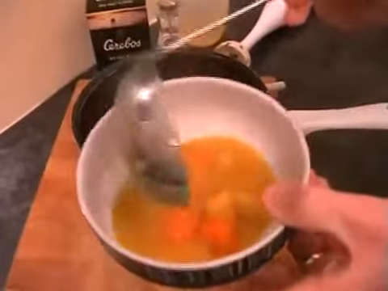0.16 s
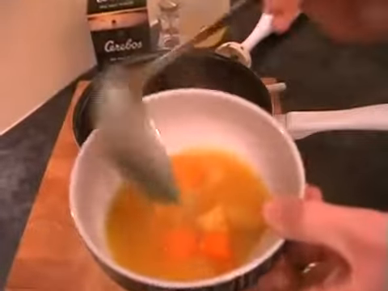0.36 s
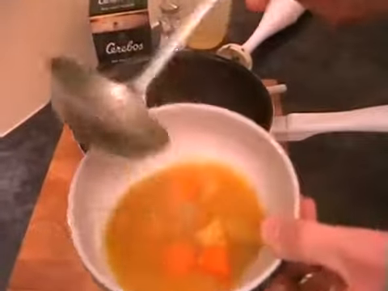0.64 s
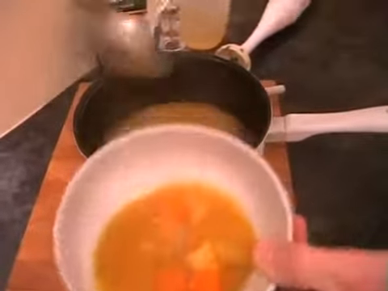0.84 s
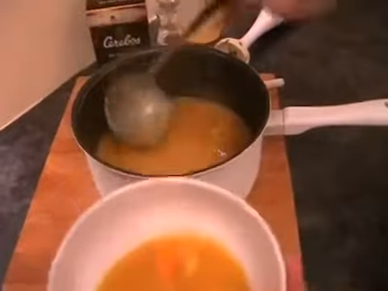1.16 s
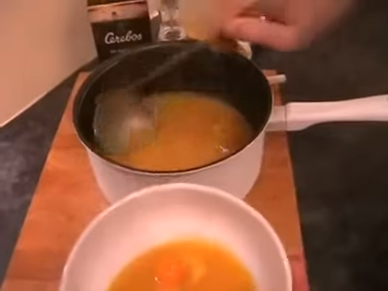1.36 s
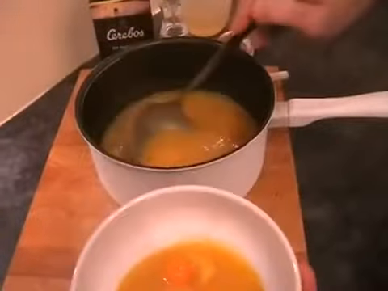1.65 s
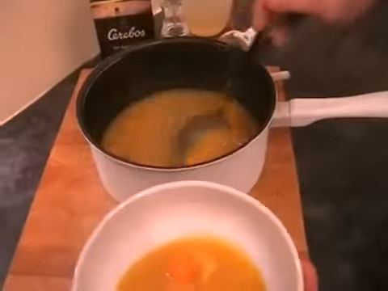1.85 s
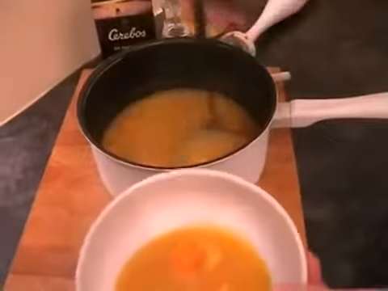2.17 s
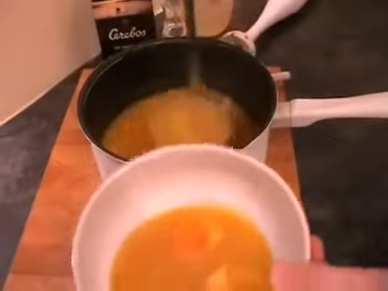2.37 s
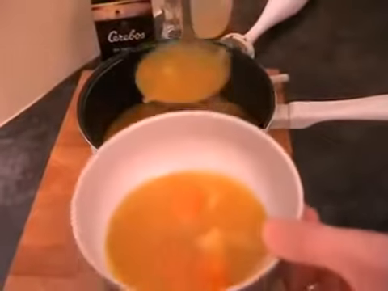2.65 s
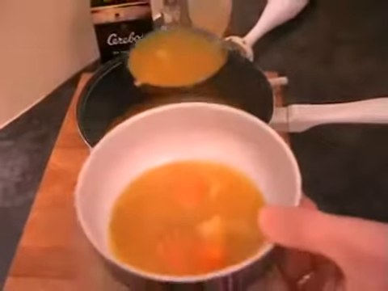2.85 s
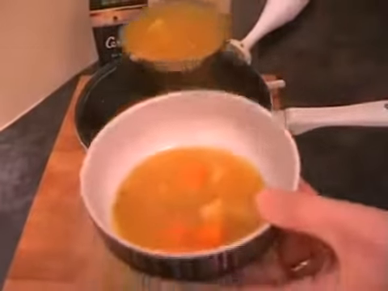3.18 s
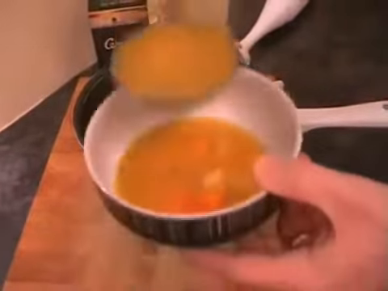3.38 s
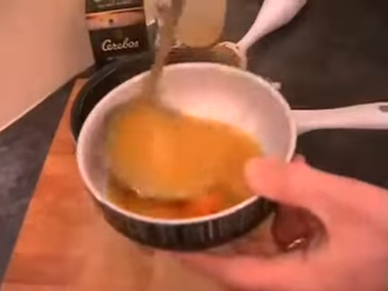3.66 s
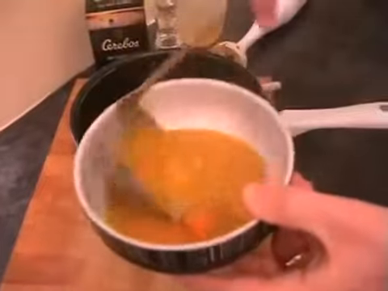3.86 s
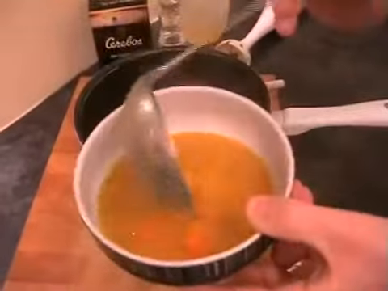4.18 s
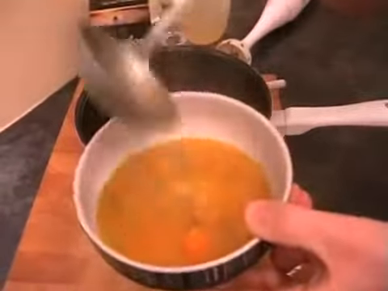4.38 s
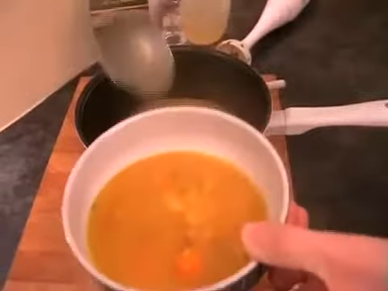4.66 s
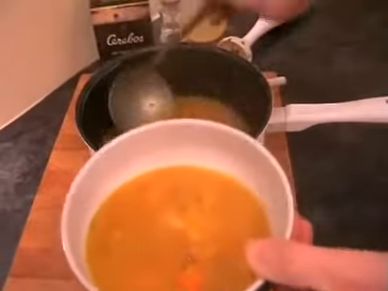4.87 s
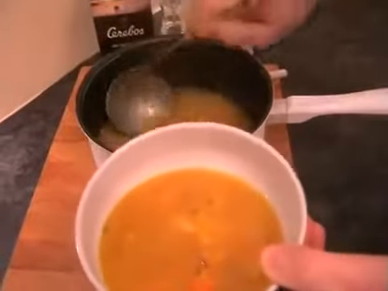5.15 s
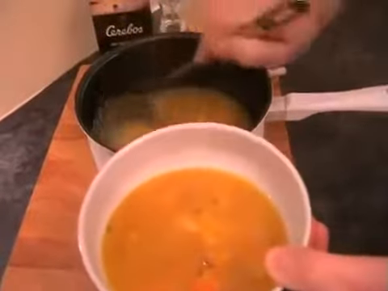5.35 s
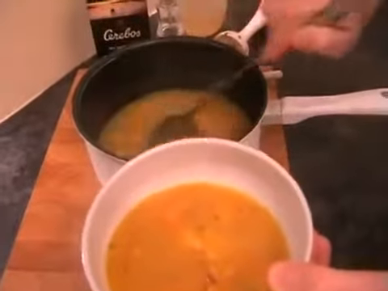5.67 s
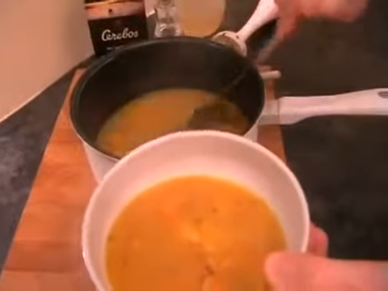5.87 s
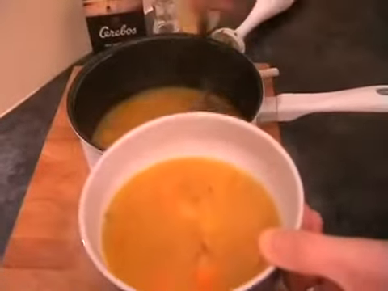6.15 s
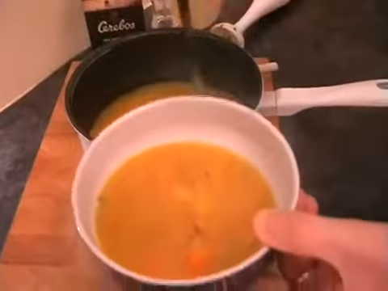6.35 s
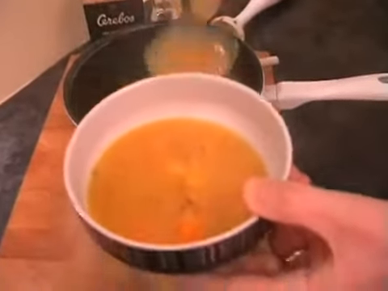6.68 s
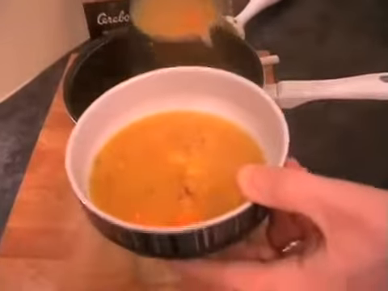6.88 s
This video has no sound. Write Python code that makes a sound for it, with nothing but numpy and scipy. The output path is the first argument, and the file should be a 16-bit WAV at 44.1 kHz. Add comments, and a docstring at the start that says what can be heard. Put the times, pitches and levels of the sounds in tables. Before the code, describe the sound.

A steel ladle knocks against a saucepan with a brief metallic ring, then scrapes and bumps around inside it. Small wet ticks and splats follow as thick soup drips into a bowl. The ladle knocks the pan again and scrapes for longer, with a heavier clunk partway through and a dull knock at the end. Everything sounds close, in a kitchen with a short echo, a faint electrical hum and a soft rumble.

```python
"""Ladling thick soup

A steel ladle serves soup into a bowl from a pan on a wooden board on a kitchen worktop.
Drops tick and splat. The ladle knocks and scrapes the pan: ladle, pan, board and worktop ring
in their own modes. Knocks and drops echo briefly over mains hum and a soft rumble."""
import sys
import numpy as np
from scipy import signal
from scipy.fft import rfft, irfft
from scipy.io import wavfile
from scipy.ndimage import uniform_filter1d

SR = 44100
rng = np.random.default_rng(int(sys.argv[2]) if len(sys.argv) > 2 else 0)


def bounce(signal):
    """Save signal as a 16-bit WAV file at the path given by the first command-line argument."""
    frames = np.transpose(np.atleast_2d(signal))
    limited = np.clip(frames, -1, 1)
    pcm = np.round(limited * 32767).astype(np.int16)
    wavfile.write(sys.argv[1], SR, pcm)


N = 309582

# room noise spectrum: f/Hz, relative density/dB
RUMBLE_SPECTRUM = [(18, -55.5), (35, -40), (75, -4.5), (100, -10), (150, -2.5), (225, -10), (280, -8),
                   (360, -1.5), (500, -9.5), (600, -10), (700, -10), (1100, -17.5), (3000, -25.5),
                   (8500, -30), (14500, -77), (16000, -42)]
# mains hum: f/Hz, rms level/dB
HUM_LINES = [(99.8, -52.5), (290, -57), (355, -57), (493, -58)]
# soup drops and small bubbles: t/s, peak/dB, f/Hz, width/oct, decay/s
DROPS = [(0.99, -32.5, 8560, 0.78, 0.0019), (1.19, -42, 7400, 1.1, 0.0022),
         (1.374, -21.5, 424, 0.29, 0.012), (1.6212, -41.5, 7400, 0.39, 0.003),
         (1.794, -38.5, 6440, 0.58, .003), (1.835, -36.5, 4100, 0.23, 0.0065),
         (1.88, -37.5, 4900, 1.6, 0.0042), (2.504, -33, 7100, 1.3, 0.01),
         (3.189, -19.5, 6240, 0.61, 0.0045), (3.6265, -28.5, 5000, 4, 0.0017),
         (3.648, -34, 5530, 1.5, 0.0048), (3.661, -37, 5000, 1.9, 0.0043), (3.693, -25, 1850, 1.9, 0.0016),
         (3.7158, -18.5, 5500, 0.87, 0.0003), (3.7178, -28, 4960, 1.2, 0.0018),
         (3.730, -52, 5000, 0.94, .002), (4.155, -30, 3900, 0.57, 0.0098),
         (4.7895, -32.5, 8600, 0.26, 0.0013), (5.759, -35.5, 2980, 2.3, 0.0013),
         (6.5795, -29, 8160, 0.44, 0.0046)]
# kitchen echo: f/Hz, t60/s, level/dB
ECHO_BANDS = [(150, 0.28, -12), (415, 0.41, -0.5), (870, 0.59, -1.5), (1730, 0.54, -3), (2760, 0.65, -7.5),
              (4900, 0.35, -10), (7660, 0.37, -7.5)]
# ladle knocks: t/s, level/dB of (crack, worktop, board, pan base, rim, wall, ladle),
# brightness/Hz, rattle/s, crack centre/Hz
KNOCKS = [(1.2614, -3, -27, -23.5, -20, -20, -25.5, -19.5, 5200, 0.0071, 2600),
          (1.94, -18, -23, -25, -14, -19, -38, -34.5, 2480, 0.009, 1820),
          (1.959, -23.5, -29, -43, -40, -23, -40.5, -61, 3040, 0.0034, 2220),
          (4.917, -12.5, -22.5, -23.5, -16.5, -20.5, -23, -31.5, 4630, 0.0079, 2830),
          (5.3368, -29, -28, -30, -27, -29.5, -36.5, -37, 4650, 0.017, 3130),
          (5.904, -14.5, -15, -19, -8, -23, -21, -45, 3150, 0.0095, 2250),
          (5.92, -16.5, -42, -44, -17, -25, -39, -43, 5870, 0.0025, 5500),
          (7.0096, -28.5, -35, -12, -22.5, -19, -34, -45, 3000, 0.0075, 2700)]
# modes of each body: f/Hz, level/dB, t60/s
LADLE_MODES = [(1223, -2, 0.42), (1306, -8.5, 0.63), (1327, -2, 0.3), (1790, -20, 0.82), (2300, -7, 0.27),
               (3046, -0.5, 0.33), (3138, -16, 0.45), (3638, 1.5, 0.23), (4700, -17, 0.23),
               (4510, -1, 0.23), (4630, -7.5, 0.33), (5540, -17, .25), (5600, -15.5, .25), (5700, -2, 0.13),
               (6040, -14.5, 0.41), (6570, -38.5, .18), (8210, -43.5, .2)]
WALL_MODES = [(1350, -1, 0.068), (1508, 0.5, 0.067), (1906, 0, 0.15), (1881, 16, 0.034), (2313, -16, 0.17),
              (2481, 3.5, 0.099), (2560, -20, 0.74), (2630, -1.5, 0.11)]
RIM_MODES = [(671.5, -2, 0.2), (728, 4.5, 0.075), (796.5, -4, 0.12), (873, 3, 0.039), (953, -8, 0.29),
             (1010, -2.5, 0.12)]
BASE_MODES = [(403.2, 3.5, 0.11), (488, 3.5, 0.013), (477.6, -15, 0.04), (527.8, 2, 0.14)]
BOARD_MODES = [(158, -11.5, 0.61), (195.1, -6, 0.84), (222.6, 1.5, 0.31), (259.6, -2, 0.66),
               (315.4, 5, 0.18)]
WORKTOP_MODES = [(111.7, 4.5, 0.38)]
# ladle drags: t/s, hold/s, level/dB, board re level/dB, height (0 base, 1 wall)
SCRAPES = [(1.327, 0.084, -36, 6, 0.96), (1.637, 0.056, -43.5, -6, 0.29), (1.749, 0.06, -33.5, -19, 0.025),
           (1.86, 0.028, -40.5, -3.5, 0.32), (5.068, 0.086, -47.5, 2, 0.2), (5.242, 0.078, -40, -14, 0.45),
           (5.388, 0.035, -41.5, 3, 0.53), (5.59, 0.12, -45.5, -2.5, 0.54), (5.793, .09, -40, -12, 0.3),
           (5.986, 0.21, -38.5, 3.5, 0), (6.105, 0.054, -47, 6, 1), (6.215, 0.043, -40.5, -1, 0.92),
           (6.272, 0.084, -42, -4, 0.55)]
# shares of a drag at height 0 and 1: base/dB, rim/dB, steel (ladle, wall, hiss)/dB
LOW_SHARES_DB, HIGH_SHARES_DB = (-1, -7, -21.5), (-11, -6, -0.5)
# ladle leaning on the pan: t/s, hold/s, level/dB
LEANS = [(1.328, .1, -30.5), (1.67, 0.035, -37), (1.781, 0.058, -30.5), (5.164, 0.03, -35),
         (5.373, 0.041, -36), (5.603, .06, -41), (5.694, 0.091, -38), (5.883, 0.022, -34.5),
         (6.293, .04, -45.5)]


def undb(db):
    """dB to gain."""
    return 10 ** (np.asarray(db) / 20)


def at_rms(x, db):
    """Scale to an rms level."""
    return x * undb(db) / np.sqrt(np.mean(x ** 2))


def band(x, centre_hz, width_oct):
    """Butterworth band-pass."""
    edges_hz = np.clip(centre_hz * 2 ** (np.array([-.5, .5]) * width_oct), 10, .45 * SR)
    return signal.sosfilt(signal.butter(2, edges_hz, "band", fs=SR, output="sos"), x)


def wander(rate_hz):
    """Smoothed random steps, spread near 1."""
    hold = int(SR / rate_hz)
    steps = np.repeat(rng.standard_normal(N // hold + 1), hold)
    return 1.3 * uniform_filter1d(uniform_filter1d(steps, hold), hold)[:N]


def add(track, start_s, piece):
    """Mix in a piece at start_s."""
    i = int(start_s * SR)
    track[i:i + len(piece)] += piece[:max(N - i, 0)]


def rumble(rms_db=-46, flicker_db=.8):
    """Room rumble and hiss; the level flickers slightly."""
    f_hz = np.fft.rfftfreq(N, 1 / SR)
    points_hz, points_db = np.array(RUMBLE_SPECTRUM).T
    shape = undb(np.interp(np.log(f_hz + 1), np.log(points_hz), points_db))
    noise = irfft(rfft(rng.standard_normal(N)) * shape, N)
    return at_rms(noise * undb(flicker_db * wander(15)), rms_db)


def mains_hum(waver_db=1.2):
    """Sine lines, each wavering in level."""
    out, t = np.zeros(N), np.arange(N) / SR
    for f_hz, db in HUM_LINES:
        amplitude = np.sqrt(2) * undb(db + waver_db * wander(5.6))
        out += amplitude * np.sin(2 * np.pi * (f_hz * t + rng.random()))
    return out


def drops():
    """Each thick drop lands with a short wet tick and its echo."""
    out, t = np.zeros(N), np.arange(SR // 2) / SR
    for start_s, peak_db, f_hz, width_oct, decay_s in DROPS:
        burst = rng.standard_normal(len(t)) * np.exp(-t / decay_s)
        tick = band(burst, f_hz, width_oct)
        tick = undb(peak_db) * tick / np.abs(tick).max()
        add(out, start_s, tick + echo(tick))
    return out


def echo(source, predelay_s=0.0023):
    """Dense reflections decay band by band; a new pattern for each spot in the kitchen."""
    tail, t = 0, np.arange(SR // 2) / SR
    for f_hz, t60_s, db in ECHO_BANDS:
        reflections = band(rng.standard_normal(len(t)) * (t > predelay_s), f_hz, 1)
        decay = np.exp(-np.log(1000) * t / t60_s)
        tail += at_rms(reflections * decay, db) * np.sqrt(f_hz / SR / len(t))
    return signal.fftconvolve(source, tail)[:len(source)]


def push(length_s):
    """Half-sine force pulse of unit area."""
    n = int(length_s * SR) + 2
    pulse = np.sin(np.pi * np.arange(1, n) / n)
    return pulse / pulse.sum()


def ring(force, modes):
    """A force drives damped modes of alternating sign."""
    out = 0
    for k, (f_hz, db, t60_s) in enumerate(modes):
        pole = np.exp(2j * np.pi * f_hz / SR - np.log(1000) / (t60_s * SR))
        mode = signal.lfilter([np.sin(np.angle(pole))], [1, -2 * pole.real, abs(pole) ** 2], force)
        out += (-1) ** k * undb(db) * mode
    return out


def knocks(base_lag_s=0.00512, board_lag_s=0.00843, worktop_lag_s=0.0103, rise_s=.0006, ring_echo_db=-4):
    """Each knock cracks and pushes ladle, wall and rim, then pan base, board and worktop."""
    out, t = np.zeros(N), np.arange(SR * 3 // 4) / SR
    for start_s, *levels_db, bright_hz, rattle_s, crack_hz in KNOCKS:
        crack_db, worktop_db, board_db, base_db, rim_db, wall_db, ladle_db = levels_db
        lowpass = [1, -np.exp(-2 * np.pi * bright_hz / SR)]
        noise = band(rng.standard_normal(len(t)), crack_hz, width_oct=2.83)
        noise = signal.lfilter([1], np.convolve(lowpass, lowpass), noise)
        crack = at_rms(noise, crack_db) * np.exp(-(t / rattle_s) ** 2) * (1 - np.exp(-t / rise_s))
        impact = push(.5 / bright_hz)  # duller contact lasts longer
        on_worktop, on_board, on_base, contact = np.zeros((4, len(t)))
        add(contact, rise_s, impact)
        add(on_base, base_lag_s, undb(base_db) * impact)
        add(on_board, board_lag_s, undb(board_db) * push(0.0018))
        add(on_worktop, worktop_lag_s, undb(worktop_db) * push(0.0071))
        rings = ring(on_worktop, WORKTOP_MODES) + ring(on_board, BOARD_MODES) + ring(on_base, BASE_MODES)
        for db, modes in (rim_db, RIM_MODES), (wall_db, WALL_MODES), (ladle_db, LADLE_MODES):
            rings += undb(db) * ring(contact, modes)
        add(out, start_s, crack + rings + echo(crack + undb(ring_echo_db) * rings))
    return out


def friction(slips_per_s=1800, judder_db=2.5):
    """Force of dense, uneven steel-on-steel slips."""
    slips = (rng.random(N) < slips_per_s / SR) * rng.standard_normal(N)
    return slips * undb(judder_db * wander(40))


def steady(x):
    """Even hand pressure: running rms held near 1."""
    return x / np.sqrt(uniform_filter1d(x ** 2, SR // 16))


def swell(start_s, hold_s, db, rise_db_per_s, fall_db_per_s):
    """Gain that reaches db at start_s, holds, then falls."""
    t = np.arange(N) / SR - start_s
    return undb(db - rise_db_per_s * np.maximum(-t, 0) - fall_db_per_s * np.maximum(t - hold_s, 0))


def scrapes(slips):
    """Slips drive ladle, pan and board; the contact hisses. Higher in the pan is brighter."""
    hiss = at_rms(band(slips, 5580, width_oct=0.88), -5)
    steel = at_rms(ring(slips, LADLE_MODES), -2.5) + at_rms(ring(slips, WALL_MODES), -0.41) + hiss
    board, base, rim = [steady(ring(slips, modes)) for modes in (BOARD_MODES, BASE_MODES, RIM_MODES)]
    pan = np.array([base, rim, steady(steel)])
    out = np.zeros(N)
    for start_s, hold_s, db, board_db, height in SCRAPES:
        shares = undb(LOW_SHARES_DB + height * np.subtract(HIGH_SHARES_DB, LOW_SHARES_DB))
        gain = swell(start_s, hold_s, db, rise_db_per_s=243, fall_db_per_s=247.5)
        out += gain * (undb(board_db) * board + shares @ pan)
    return out


def leans(slips):
    """The ladle's weight leans the pan on the worktop; slips drive its low mode."""
    gain = sum(swell(*lean, rise_db_per_s=297, fall_db_per_s=253) for lean in LEANS)
    return gain * steady(ring(slips, WORKTOP_MODES))


def scene(low_cut_hz=86):
    """Near sounds over the quiet kitchen, mono."""
    impacts = knocks() + drops()
    slips = friction()
    near = impacts + scrapes(slips) + leans(slips)
    # small objects radiate little deep bass
    highpass = signal.butter(3, low_cut_hz, "high", fs=SR, output="sos")
    return (signal.sosfilt(highpass, near) + rumble() + mains_hum())[None]


def record(dry, drive=1.05, top_hz=9300):
    """A small camera rounds the peaks and cuts the treble."""
    lowpass = signal.ellip(8, .2, 33, top_hz, fs=SR, output="sos")
    return signal.sosfilt(lowpass, np.tanh(drive * dry) / drive)


dry = scene()
out = record(dry)
bounce(out)
```